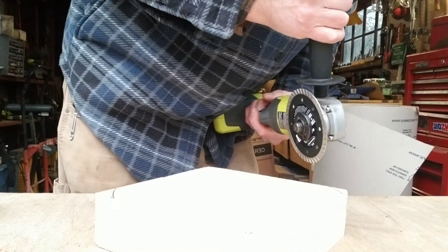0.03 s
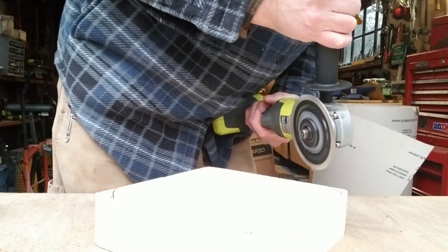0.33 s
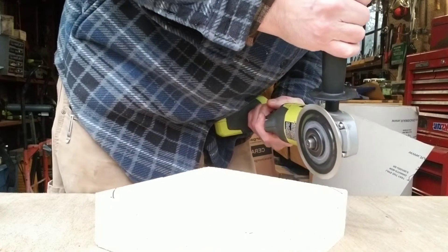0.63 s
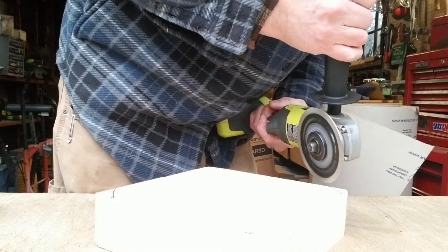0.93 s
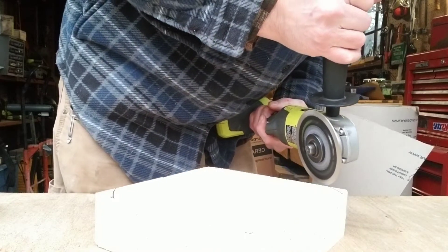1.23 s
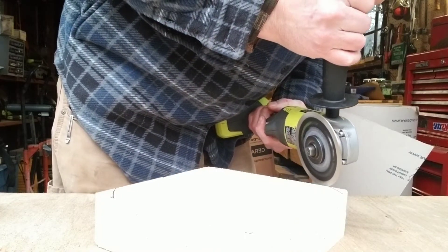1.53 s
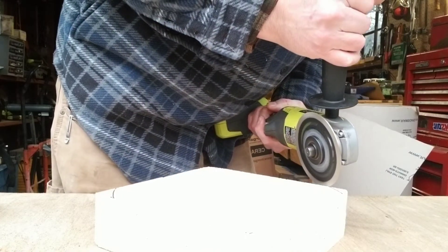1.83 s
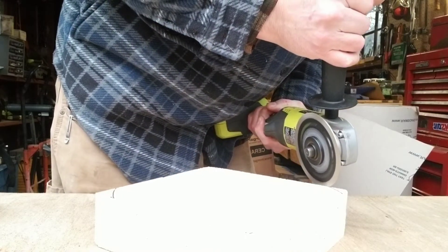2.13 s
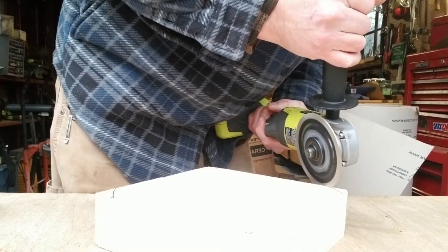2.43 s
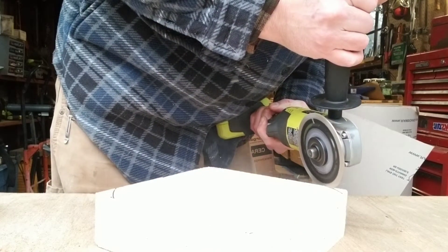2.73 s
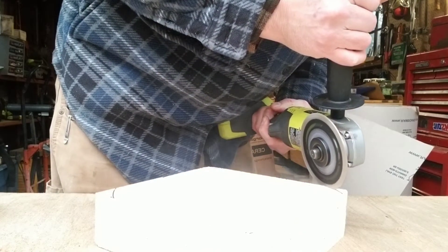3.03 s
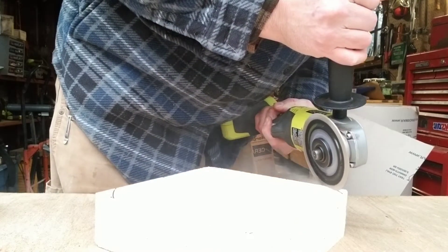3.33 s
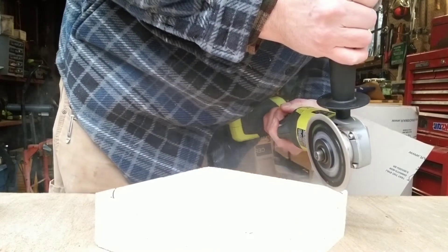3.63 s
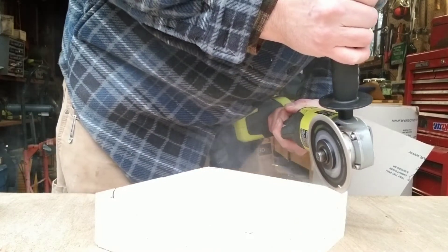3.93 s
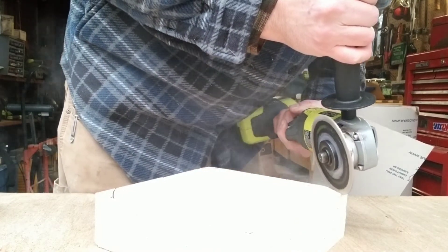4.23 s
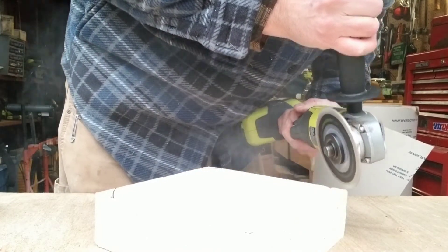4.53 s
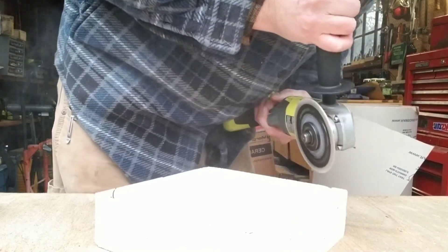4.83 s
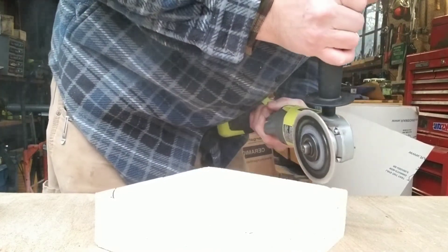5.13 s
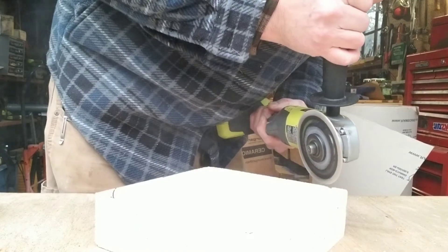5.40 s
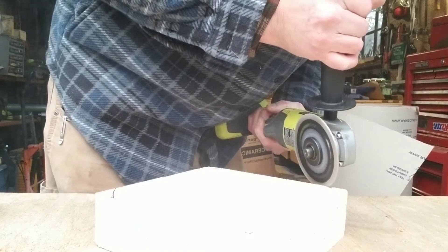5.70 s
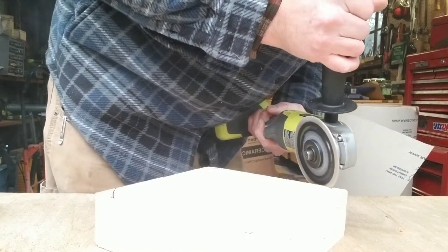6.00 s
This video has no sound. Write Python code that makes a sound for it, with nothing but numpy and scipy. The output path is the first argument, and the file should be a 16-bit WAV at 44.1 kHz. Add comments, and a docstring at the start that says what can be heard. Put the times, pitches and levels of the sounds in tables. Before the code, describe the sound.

At about 0.2 seconds a cordless angle grinder starts with a sharp click, close to the microphone in a workshop. Its gears grind and sweep quickly upward, settling within a second into a high whine with rushing air and a fast metallic rattle. At 1.5 seconds the steel blade briefly grazes a soft brick. From 1.7 seconds it cuts steadily, making a very high, gritty, ringing sizzle with uneven surges and a few tiny squeals. The motor sags slightly in pitch and recedes beneath the grinding, while the workbench hums and shudders faintly. At about 4.5 seconds the blade lifts off, and the motor recovers its speed and spins freely, much quieter than at the start. Around 5.85 seconds the blade bites into the brick again, scraping until the sound ends just after 6 seconds.

```python
"""Cordless angle grinder on brick.

In a workshop the grinder clicks on, runs up, grazes a soft brick, cuts, lifts off and bites again.
Rotor speed sets the gear whine and the rattle of the gear play; the fan rushes.
Grit rings the steel blade and shakes the bench, where two close microphone ports listen.
The heard level of fan and rattle falls during the long cut and stays low afterwards."""
import sys
import numpy as np
from scipy import signal
from scipy.fft import rfft, irfft, next_fast_len
from scipy.io import wavfile

SR = 44100
rng = np.random.default_rng(int(sys.argv[2]) if len(sys.argv) > 2 else 0)


def to_wav(sig):
    """Store sig (one row per channel, or 1-D mono) as 16-bit WAV at the path in sys.argv[1].

    Samples outside -1..1 are clipped; the rate is SR.
    """
    pcm = np.clip(np.atleast_2d(sig), -1, 1) * 32767
    pcm = np.round(pcm).astype(np.int16)
    wavfile.write(sys.argv[1], SR, pcm.T)  # frames by channels


N = 267290
T = np.arange(N) / SR
N_FFT = 2 * next_fast_len(N // 2 + 2048, True)
FREQ_HZ = np.fft.rfftfreq(N_FFT, 1 / SR)

ON_S, FREE_HZ = 0.192, 293.3  # motor start, free rotor speed
GRIP_POWER = 7.6  # the slot grips the blade only near full feed


def undb(db):
    """Decibels to gain."""
    return np.exp(np.asarray(db) * np.log(10) / 20)


def unit(x):
    """Scale to rms 1."""
    return x / np.sqrt(np.mean(x ** 2))


def gains(table, fade_s=0.0046):
    """The dB columns of a time curve as gains, silent outside its span."""
    times, *columns = np.transpose(table)
    gate = np.clip(np.minimum(T - times[0], times[-1] - T) / fade_s + 1, 0, 1)
    return [gate * undb(np.interp(T, times, db)) for db in columns]


def walk(rate_hz):
    """Smooth random drift, spread near 1."""
    return 1.23 * np.interp(T * rate_hz, np.arange(N // 10), rng.standard_normal(N // 10))


def bump(at_s, sigma_s):
    """Gaussian swell, peak 1."""
    return np.exp(-.5 * ((T - at_s) / sigma_s) ** 2)


def swells(table):
    """Sum of bumps from rows of t/s, level/dB, sigma/s."""
    return sum(undb(db) * bump(at_s, sigma_s) for at_s, db, sigma_s in table)


def lagged(x, tau_s):
    """One-pole lag."""
    pole = np.exp(-1 / (tau_s * SR))
    return signal.lfilter([1 - pole], [1, -pole], x)


def colour(points):
    """Response through f/Hz, gain/dB points, falling away below the first."""
    hz, db = np.transpose(points)
    return undb(np.interp(np.log(FREQ_HZ + 1), np.log(hz), db)) * np.minimum(FREQ_HZ / hz[0], 1) ** 2


def modes(table, skirt=1.53):
    """Resonances summed in power; one response per dB column."""
    hz, width_hz, *levels = np.transpose(table)
    bells = (1 + (2 * (FREQ_HZ - hz[:, None]) / width_hz[:, None]) ** 2 / skirt) ** -skirt
    return [np.sqrt(undb(db) ** 2 @ bells) for db in levels]


def minimum_phase(gain):
    """Phase that makes a body ring after a blow, never before."""
    cepstrum = irfft(np.log(gain + gain.max() / 1000))
    cepstrum[N_FFT // 2:] = 0
    return np.exp(2j * rfft(cepstrum).imag)


def excite(force, mid, side, band_hz=None, direct=0.9, blows=0):
    """Fine random impacts and single blows ring a body, in stereo; unit mid gain over band_hz."""
    impacts = force * rng.standard_normal((2, N)) + blows
    near, scattered = rfft(impacts, N_FFT) * minimum_phase(np.hypot(mid, side))
    centre = irfft(near * mid)[:N]
    # direct sound reaches the right port first
    spread = irfft((np.sqrt(1 - direct ** 2) * scattered - 1j * direct * near) * side)[:N]
    power = np.mean(mid ** 2 * ((FREQ_HZ > band_hz[0]) & (FREQ_HZ < band_hz[1]))) if band_hz else 1
    return np.array([centre + spread, centre - spread]) / np.sqrt(power)


def tones(hz, orders, flutter_db=1.5):
    """Fluttering multiples of a frequency, slightly later at the left port."""
    lag_s = np.array([[5.4e-5], [0]])
    turns = np.cumsum(hz) / SR - lag_s * hz
    return np.sqrt(2) * sum(
        undb(db + flutter_db * walk(25)) * np.sin(2 * np.pi * (order * turns + rng.random()))
        for order, db in orders)


# handling thumps: t/s, level/dB, sigma/s
THUMPS = [(0.163, -69, 0.057), (0.24, -49, 0.046), (1.502, -64, 0.015), (1.774, -47.5, 0.017),
          (2.226, -49, 0.02), (2.61, -61, .02), (2.72, -58, 0.026), (2.9, -59, .015), (3.323, -58, .015),
          (3.94, -54, .02), (5.948, -56, 0.051)]
# room rumble spectrum: f/Hz, gain/dB
ROOM_COLOUR = [(28, -13), (50, 0.5), (120, 0), (170, -10.5), (260, -7), (400, -21.5), (800, -13.5),
               (1200, -20.5), (6000, -53.5)]
# low hums: f/Hz, relative level/dB, swell start/s
HUMS = [(76.5, -53.5, 5.0), (117, -51.2, 4.45)]


def workshop():
    """Room and handling rumble that follows the heard fan level; two hums swell after the long cut."""
    fan, _ = gains(HEARD_LEVELS)
    force = undb(-68) + undb(-27) * fan + undb(-51) * (T < ON_S) + swells(THUMPS)
    room = colour(ROOM_COLOUR)
    rumble = excite(force, room, undb(-17) * room, band_hz=(25, 68), direct=0.21)
    hum = 0
    for hz, db, swell_s in HUMS:
        swell = undb(-4.5 * np.clip(1 - (T - swell_s) / .25, 0, 1))
        hum += swell * tones(np.full(N, hz), [(1, db)], flutter_db=0.5)
    return rumble + undb(-4) * hum


# bench vibration: t/s, rumble/dB, push/dB, drone/dB
BENCH_LEVELS = [(1.7, -56, -57, -56), (2.1, -54, -60, -62), (2.2, -55.5, -54, -47.5),
                (2.45, -52, -53, -42.5), (2.57, -46.5, -54, -41), (2.65, -49.5, -59, -41),
                (2.84, -49, -48, -43), (3.01, -47, -52, -38), (3.09, -49.5, -54, -47.5),
                (3.3, -51.5, -51, -48), (3.55, -46.5, -49, -47), (3.97, -56, -47, -49),
                (4.08, -54, -47.5, -58), (4.28, -48, -39.5, -55), (4.34, -52, -46.5, -57),
                (4.4, -51, -43, -40), (4.49, -51, -46, -48), (5.88, -46, -55, -60), (6.05, -57, -49, -35)]
# brick shudders: t/s, level/dB, sigma/s
SHUDDERS = [(1.77, -60, 0.013), (2.224, -56, 0.022), (3.92, -48, 0.048), (6.058, -41, 0.025)]
# bench spectrum: f/Hz, gain/dB
BENCH_COLOUR = [(60, -8.5), (100, -9.5), (133, 0.5), (155, -11), (180, 0.5), (215, -5.5), (300, -5),
                (345, -17), (500, -14), (1500, -29), (8000, -37)]
# hop on every other turn: blade order, relative level/dB
JUDDER_ORDERS = [(1.5, 0), (2.5, -9), (3.5, -1)]
# once-a-turn push: blade order, relative level/dB
PUSH_ORDERS = [(1, 0), (2, -9), (4, -20), (5, -14)]


def bench(blade_hz, load):
    """The blade shakes brick and bench: rumble, low drone, and judder when it hops in the slot."""
    rumble_gain, push_gain, drone_gain = load * np.array(gains(BENCH_LEVELS))
    force = rumble_gain * undb(2.5 * walk(18)) + swells(SHUDDERS)
    body = colour(BENCH_COLOUR)
    rumble = excite(force, body, undb(-5) * body, band_hz=(110, 220), direct=0.17)
    drone_gain *= undb(2 * walk(60) - 1)
    drone = drone_gain * tones(blade_hz * (1 + .013 * walk(40)), [(3, 0)], flutter_db=2.5)
    judder = undb(-50.5) * bump(at_s=3.82, sigma_s=0.18) * tones(blade_hz, JUDDER_ORDERS, flutter_db=2.5)
    push = push_gain * tones(blade_hz, PUSH_ORDERS)
    return rumble + push + drone + judder


# trigger click, then gear clack: t/s, level/dB, decay/s
CLICKS = [(0.1635, -33, 0.002), (0.166, -31, 0.002), (0.192, -12.2, 0.0025), (0.1965, -22, 0.003)]
# click spectrum: f/Hz, gain/dB
CLICK_COLOUR = [(59, -41), (100, -29), (300, -2), (814, 2.5), (1350, -3), (1950, 5), (3200, -2),
                (4000, -3.5), (6760, -10), (10100, -28), (13500, -17), (15000, -34)]


def switch_on():
    """The trigger clicks, the gears take up their play and the stalled motor pings."""
    force = sum(undb(db) * (T >= at_s) * np.exp(-abs(T - at_s) / decay_s) for at_s, db, decay_s in CLICKS)
    body = colour(CLICK_COLOUR)
    clicks = excite(force, body, undb(-7) * body, band_hz=(100, 15000))
    age_s = np.maximum(T - ON_S, 0)
    ping = tones(np.full(N, 6880.), [(1, -19.5)]) * (age_s > 0) * np.exp(-age_s / 0.018)
    return clicks + ping


# gear grind spectrum, mid and side: f/Hz, gain/dB
GRIND_MID = [(800, -33), (1300, -14), (2060, 0), (2450, -4), (3300, 5), (4050, -7), (4800, 3), (5500, 1),
             (6400, -1), (6920, 6.5), (7200, -34), (15000, -19)]
GRIND_SIDE = [(800, -28), (2000, -6), (3500, 4), (4000, -8), (5200, -2), (6200, -1), (6920, 9), (7200, -17),
              (15000, -20)]
# housing resonances swept by the mesh tones: f/Hz, width/Hz, gain/dB
SWEPT_MODES = [(1560, 260, -11), (2080, 380, 0), (2950, 260, -2), (3520, 300, 2), (4510, 220, 7),
               (5150, 300, -3), (6850, 200, 0)]
# mesh tones under torque: rotor order, relative level/dB
MESH_ORDERS = [(11, 0), (17, -11), (22, 1), (33, -3)]


def run_up(rotor_hz, gap_hz):
    """Starting torque grinds the gears and rings the housing, fading as the rotor nears free speed."""
    soft_start_s = 0.066
    current = np.minimum(np.maximum(T - ON_S, 0) / soft_start_s, 1) ** 2
    torque = current * np.maximum(gap_hz / FREE_HZ - .015, 0)
    grind_force = torque * undb(-17 + 0.55 * walk(340))
    grind = excite(grind_force, colour(GRIND_MID), colour(GRIND_SIDE), band_hz=(5300, 7200), direct=0.66)
    ring_force = undb(-21) * current * torque ** 0.38 * (rotor_hz / FREE_HZ) ** 0.53
    ring_modes = modes([(4490, 150, 0, 3), (4900, 200, -10, -6)])
    ring = excite(ring_force, *ring_modes, band_hz=(4300, 4800), direct=0.81)
    housing, = modes(SWEPT_MODES)
    unsteady_hz = rotor_hz * (1 + .013 * walk(300))
    pressure = np.minimum(torque / .36, 1) ** 2 * undb(3.5 * walk(400))
    mesh = sum(np.interp(order * rotor_hz, FREQ_HZ, housing) * tones(unsteady_hz, [(order, db)])
               for order, db in MESH_ORDERS)
    return grind + ring + undb(-27.8) * pressure * mesh


def knocks(hz, late_turns, jitter=.16, scatter_db=3.5, rebound=.58, rebound_s=.0033):
    """Tooth blows about 1 + late_turns apart, each rebounding twice; rows are direct and scattered."""
    count = np.cumsum(hz / (1 + abs(late_turns))) / SR
    spacing, strength, *delays = rng.random((N // 400, 7)).T
    onsets = np.searchsorted(count, np.cumsum(1 + jitter * (spacing - .5)))
    size = undb(scatter_db * strength)
    first = np.bincount(onsets, size, N)[:N]
    later = [np.bincount(onsets + (SR * rebound_s * delay).astype(int), size, N)[:N] for delay in delays]
    return unit(np.array([first + rebound * sum(later[:2]), rebound * sum(later[2:])]))


# fan and rattle level as heard: t/s, fan/dB, rattle/dB
HEARD_LEVELS = [(0.21, -33.5, -26.5), (0.6, -33, -34.5), (1.45, -32.5, -31.5), (1.8, -40.5, -40.5),
                (2.9, -46.5, -48), (3.5, -48.5, -69), (4.4, -48.5, -50), (4.7, -51.5, -54.5),
                (5.55, -52, -52.5), (6.06, -42.5, -52)]
# fan spectrum, mid and side: f/Hz, gain/dB
FAN_MID = [(110, -11), (190, -16), (290, -7.5), (500, -7.5), (630, -8.5), (800, -5.5), (1050, -8.5),
           (1320, -5), (1650, -11.5), (2050, -7.5), (2400, -11), (3200, -6.5), (4700, -16), (5800, -17.5),
           (6800, -16.5), (9000, -21), (15500, -24)]
FAN_SIDE = [(100, -58), (400, -51), (700, -6.5), (1050, -20.5), (1600, -16), (2600, -11.5), (5000, -7),
            (7000, -16), (9000, -24), (15500, -22)]
# gear housing modes: f/Hz, width/Hz, mid/dB, side/dB
HOUSING_MODES = [(2780, 150, -10, -14), (3140, 170, -1, -9), (3260, 160, -1.5, -7), (3850, 300, -16, -10),
                 (4170, 60, -7, -13), (4550, 130, -2, -1.5), (4690, 140, -12, -2.5), (4890, 200, -7, -6)]
# rotor, mesh and commutator tones: rotor order, relative level/dB
WHINE_ORDERS = [(1, -13.5), (2, -20), (11, -11), (17, -23), (22, -23), (23, -13), (24, -7), (25, -21),
                (26, -22), (30, -22), (34, -26), (35, -15.5), (36, -19), (48, -25)]
# gear tones under load: blade order, relative level/dB
STRAIN_ORDERS = [(5, -58), (9, -64), (10, -65), (34, -51)]


def motor(rotor_hz, blade_hz, load, feed):
    """Fan rush, whine and teeth knocking through their play; load lowers these and adds gear tones."""
    fan, rattle = gains(HEARD_LEVELS)
    loose_hz, coast_hz = 32, 3.1  # gaps to free speed within which the teeth come loose, then coast
    gap_hz = abs(FREE_HZ - rotor_hz)
    loose = 1 / (1 + (gap_hz / loose_hz) ** 8)
    coasting = (1 + .2 * walk(40)) / (1 + (gap_hz / coast_hz) ** 4)
    blows = loose * knocks(blade_hz, late_turns=.02 + .95 * coasting)
    jolt = unit(lagged(blows[0], tau_s=0.0017))
    airflow = fan * unit(1 + 0.22 * jolt)
    rush = excite(airflow, colour(FAN_MID), colour(FAN_SIDE), band_hz=(600, 2000), direct=0.55)
    rub = .45 * jolt + .2 + .2 * load + .6 * (1 - loose)
    gears = excite(rattle * rub, *modes(HOUSING_MODES), band_hz=(2900, 3500), direct=.65,
                   blows=.9 * rattle * blows)
    whine = undb(3.5) * fan * (rotor_hz / FREE_HZ) ** 3 * tones(rotor_hz, WHINE_ORDERS)
    strain = load * undb(2 - 5 * feed ** GRIP_POWER) * tones(blade_hz, STRAIN_ORDERS, flutter_db=4.5)
    return undb(-4.5 * load) * (rush + whine) + undb(-5.5 * load) * gears + strain


# blade snags: t/s, relative level/dB, sigma/s
SNAGS = [(1.512, -41, 0.014), (1.754, -30, 0.012), (1.796, -37, 0.013), (2.228, -26, 0.0074),
         (2.519, -28, 0.0062), (3.548, -30, 0.0091), (5.927, -25.5, 0.0036)]


def squeal():
    """Each snag rings one narrow blade mode."""
    return undb(-5) * excite(swells(SNAGS), *modes([(6480, 60, 0, 6)]), band_hz=(6000, 8500))


# blade modes in the slot: f/Hz, width/Hz, mid/dB, side/dB, best depth (0-1)
SLOT_MODES = [(11150, 70, -13, -15, .03), (12525, 55, -1.5, -13, .1), (13460, 90, -7, -9, .03),
              (13385, 50, -2.5, 3.5, .33), (13350, 40, 0, 3, .58), (12580, 200, -12, -16, .68),
              (13670, 330, -8, -8, .8), (14500, 500, -20, -20, .7)]


def slot(force, feed, depth_span=.17):
    """The slot holds the sinking blade at new places: clear modes ring first, broad damped ones last."""
    depth = lagged(feed, tau_s=1)
    ring = 0
    for *mode, best_depth in SLOT_MODES:
        share = np.exp(-.5 * ((depth - best_depth) / depth_span) ** 2) * undb(1.5 * walk(9))
        ring += excite(force * share, *modes([mode]), direct=0.94)
    return undb(19.5) * ring


def contact(touch_s, lift_s, release_s, bite_s=.012):
    """Envelope of one contact: the rim sinks in, holds and rings off."""
    return np.clip((T - touch_s) / bite_s, 0, 1) * np.exp(-np.maximum(T - lift_s, 0) / release_s)


def chatter(blade_hz, feed, bounce_db=2.2, scatter_db=1.9, rise_turns=.087, decay_turns=.22):
    """Gritty rub plus one bite a turn from the rim's high spot; bounce alternates strong and weak."""
    phase, turn = np.modf(np.cumsum(blade_hz) / SR)
    turn = turn.astype(int)
    size_db = bounce_db * walk(6) * (-1.) ** turn + scatter_db * rng.standard_normal(N // 400)[turn]
    bite = (1.3 + feed) * undb(size_db) * np.minimum(phase / rise_turns, 1) * np.exp(-phase / decay_turns)
    roughness = undb(1.4 * walk(60) + 0.5 * walk(350) + 1.3 * walk(3000))
    return unit((1 + bite) * roughness)


# blade on brick: touch/s, lift/s, release/s, rim force/dB, flank force/dB
CONTACTS = [(1.492, 1.555, 0.034, -25, -36), (1.707, 4.475, .015, -29.5, -39.5),
            (5.846, 6.06, 0.012, -30.5, -40.5)]
# harder or lighter bite: t/s, change/dB, sigma/s
SURGES = [(1.747, 4, 0.017), (1.901, -3, 0.013), (1.988, -2, 0.0098), (2.046, 3.5, 0.025),
          (2.12, 2, 0.0069), (2.255, 5.5, 0.02), (2.585, 4.5, 0.034), (2.814, -3.5, 0.042),
          (3.107, 4, 0.058), (3.264, 2.5, 0.017), (3.402, -3, 0.017), (3.556, 3.5, 0.015),
          (4.036, 2.5, 0.02), (4.304, 2, 0.074)]
# steel blade modes: f/Hz, width/Hz, mid/dB, side/dB
BLADE_MODES = [(2780.0, 119.0, -21.0, -21.0), (3150.0, 230.0, -19.0, -22.0), (4950.0, 403.0, -29.0, -16.0),
               (5400.0, 143.0, -21.0, -16.0), (5820.0, 49.0, -25.0, -41.0), (6470.0, 84.0, -15.0, -8.0),
               (7020.0, 160.0, -19.0, -11.0), (7620.0, 175.0, -26.0, -17.0), (8030.0, 133.0, -19.0, -16.0),
               (8790.0, 122.0, -20.0, -14.0), (9030.0, 38.0, -41.0, -9.0), (9480.0, 35.0, -30.0, -20.0),
               (10090.0, 64.0, -12.0, -12.0), (11000.0, 110.0, -15.0, -7.0), (11570.0, 53.0, -13.0, -18.0),
               (12527.0, 85.0, -10.5, -18.0), (12890.0, 33.0, -19.0, -41.0), (13360.0, 70.0, -9.0, -5.0),
               (13620.0, 49.0, -8.0, -11.0), (13815.0, 70.0, -5.0, -16.0), (15375.0, 172.0, -15.0, -19.0),
               (15730.0, 100.0, -10.0, -13.0)]
# broadband dust under the modes: f/Hz, gain/dB
DUST_COLOUR = [(500, -52), (820, -32.5), (1100, -37.5), (1350, -28), (1600, -38.5), (2000, -26.5),
               (2450, -32.5), (3700, -32.5), (4500, -24), (9500, -38), (12000, -21.5), (15500, -25)]
# very faint hiss of powder leaving the slot: f/Hz, gain/dB
POWDER_COLOUR = [(9800, -14), (10800, 7), (12000, -8), (13400, -9), (14600, -13), (15600, 8)]
# blade modes deep in the slot: f/Hz, width/Hz, mid/dB, side/dB
DEEP_MODES = [(2790, 50, -14, -16), (5450, 160, -12, -7), (7020, 110, -6, 1), (7620, 90, -8, 0),
              (9030, 40, -14, 3), (11000, 100, -3, 4), (15730, 70, 0, -3)]


def cut(blade_hz, feed):
    """Grit strikes the blade: the rim sizzles in the high modes, the flanks rub the lower ones."""
    surge_db = sum(db * bump(at_s, sigma_s) for at_s, db, sigma_s in SURGES) + .35 * walk(22.18)
    sizzle = undb(surge_db) * sum(contact(*times) * undb(db) for *times, db, _ in CONTACTS)
    scrape = undb(0.58 * surge_db) * sum(contact(*times) * undb(db) for *times, _, db in CONTACTS)
    grit = chatter(blade_hz, feed)
    rim_force = sizzle * grit
    flank_force = scrape * unit(grit ** 0.61)  # flanks rub more evenly
    mid, side = np.hypot(modes(BLADE_MODES, skirt=1.6), colour(DUST_COLOUR))
    high = 1 / (1 + (9700 / (FREQ_HZ + 1)) ** 14)
    low = 1 - high
    rim = undb(-2.5) * excite(rim_force, mid * high, side * high, band_hz=(12000, 15000), direct=0.48)
    hiss = colour(POWDER_COLOUR)
    powder = excite(rim_force * undb(-106 + 28 * feed), hiss, hiss, band_hz=(12000, 15000), direct=0.61)
    apart = np.minimum(FREQ_HZ / 2700, 1)  # long waves reach both ports alike
    flanks = excite(flank_force, mid * low, side * apart * low, band_hz=(6000, 8500), direct=0.73)
    squeals = squeal()
    deep = undb(2) * excite(flank_force * feed ** GRIP_POWER, *modes(DEEP_MODES), band_hz=(6000, 12000))
    return rim + powder + flanks + squeals + deep + slot(rim_force, feed)


# hand pressure on the blade: t/s, feed (0-1)
FEED = [(1.85, .02), (2.2, .33), (2.6, .7), (3.15, .74), (3.45, .86), (3.8, 1), (4.5, 1), (5.85, .35)]
# run-up stages: gap to free speed/Hz, time constant/s
RUN_UP_STAGES = [(110, .04), (175, .18), (6.3, 1.1)]


def scene():
    """One rotor drives gears and blade: it runs up, sags under feed and recovers when the blade lifts."""
    sag_hz, inertia_s = 20.6, 0.12
    pinion_teeth, crown_teeth = 11, 34
    load = np.minimum(sum(contact(*row[:3]) for row in CONTACTS), 1)
    feed = lagged(load * np.interp(T, *np.transpose(FEED)), inertia_s)
    gap_hz = sum(hz * np.exp(-np.maximum(T - ON_S, 0) / tau_s) for hz, tau_s in RUN_UP_STAGES)
    rotor_hz = (FREE_HZ - gap_hz - sag_hz * feed) * (1 + .0008 * walk(30))
    blade_hz = rotor_hz * pinion_teeth / crown_teeth
    tool = motor(rotor_hz, blade_hz, load, feed) + switch_on() + run_up(rotor_hz, gap_hz)
    return tool + cut(blade_hz, feed) + bench(blade_hz, load) + workshop()


# microphone port balance: f/Hz, left minus right/dB
PORT_BALANCE = [(60, 1.5), (200, -0.5), (1000, -0.5), (2600, 1.4), (8000, 1.1), (15000, 0.5)]


def record(dry, top_hz=15760):
    """Two ports of slightly unlike colour, then a steep low-pass."""
    balance_db = np.interp(FREQ_HZ, *np.transpose(PORT_BALANCE))
    ports = undb(np.array([balance_db, -balance_db]) / 2)
    heard = irfft(rfft(dry, N_FFT) * ports)[:, :N]
    return signal.sosfilt(signal.ellip(16, .3, 80, top_hz, fs=SR, output="sos"), heard)


dry = scene()
out = record(dry)
to_wav(out)
```